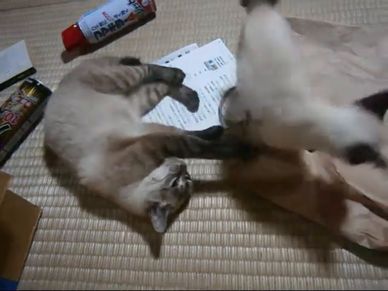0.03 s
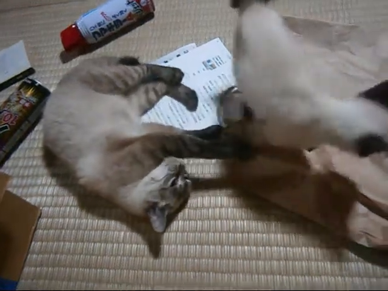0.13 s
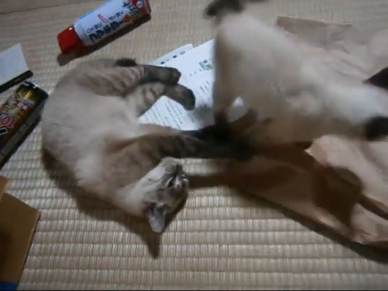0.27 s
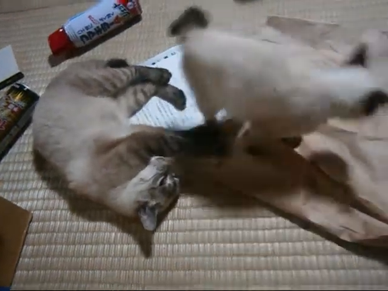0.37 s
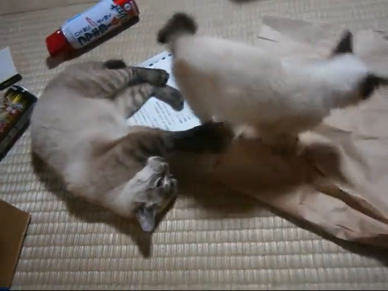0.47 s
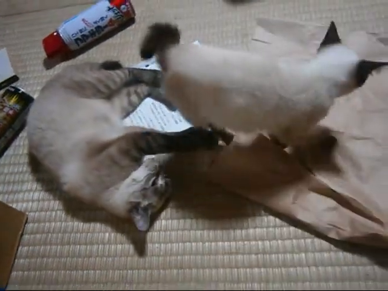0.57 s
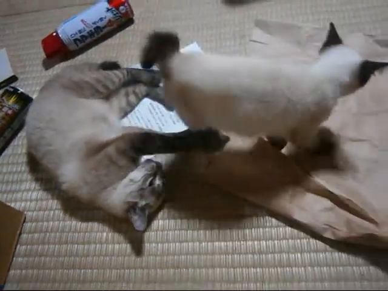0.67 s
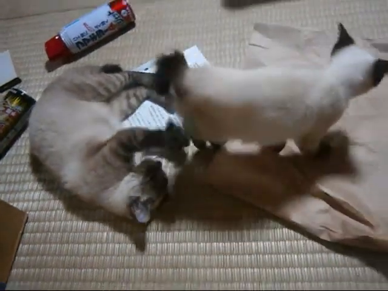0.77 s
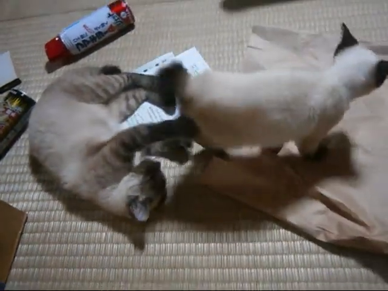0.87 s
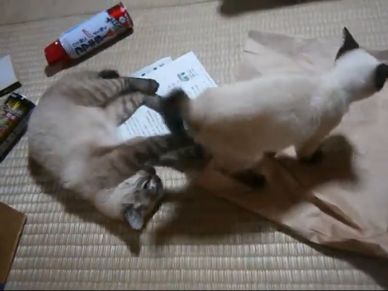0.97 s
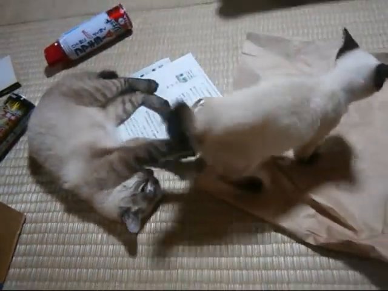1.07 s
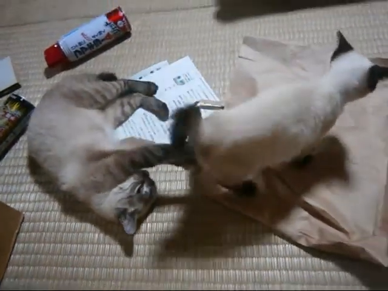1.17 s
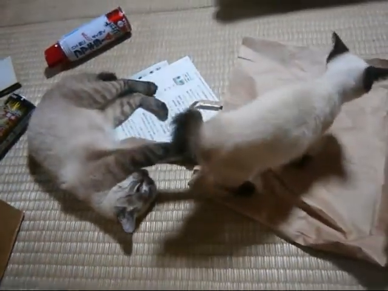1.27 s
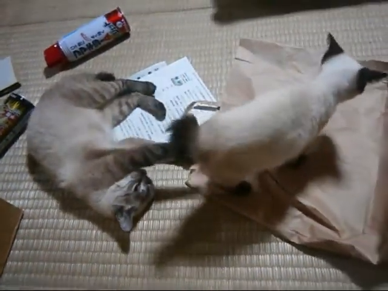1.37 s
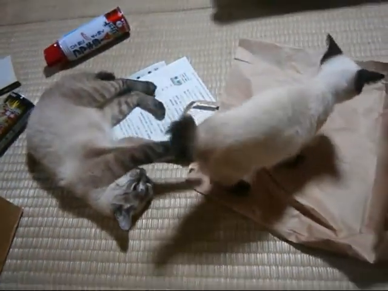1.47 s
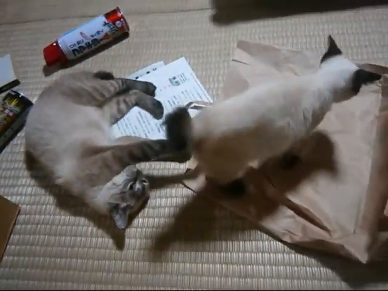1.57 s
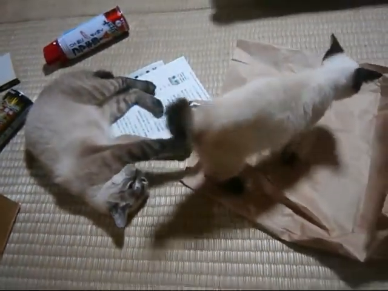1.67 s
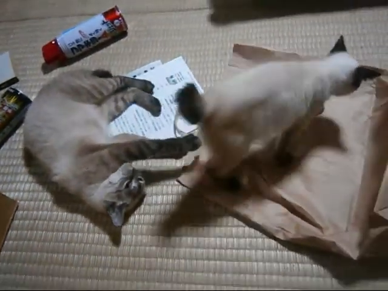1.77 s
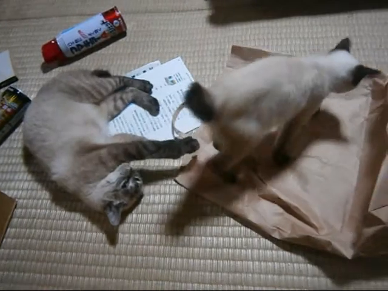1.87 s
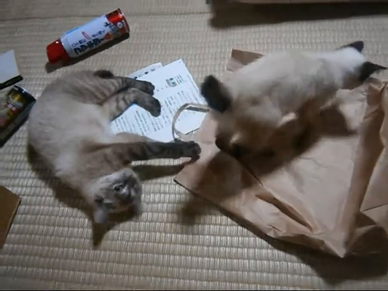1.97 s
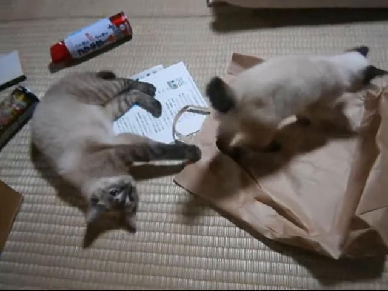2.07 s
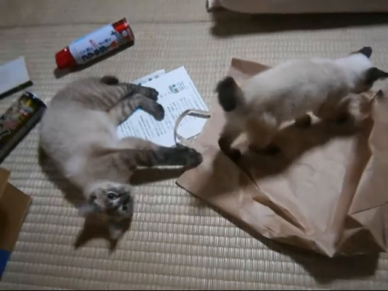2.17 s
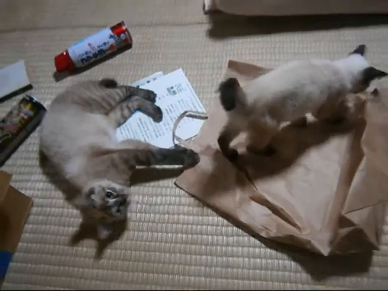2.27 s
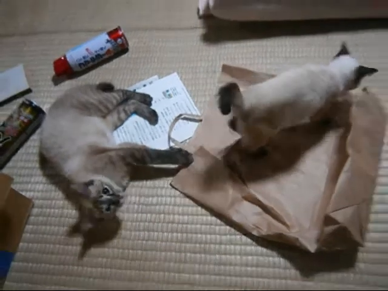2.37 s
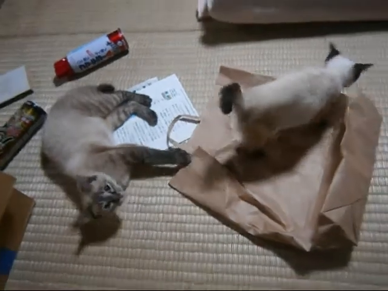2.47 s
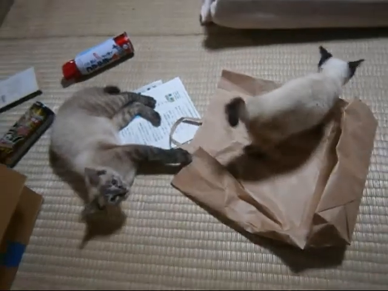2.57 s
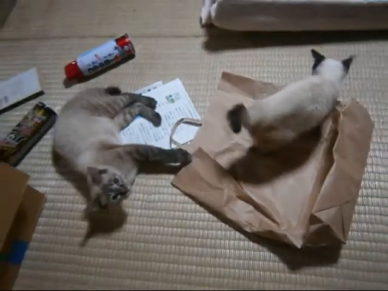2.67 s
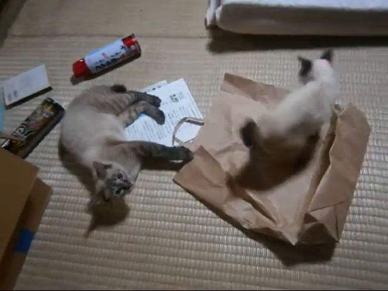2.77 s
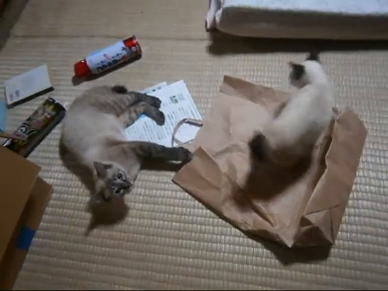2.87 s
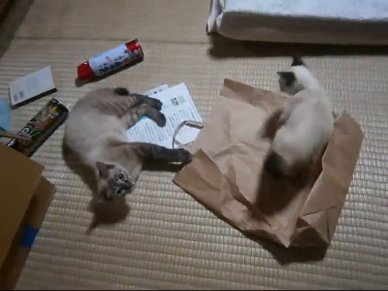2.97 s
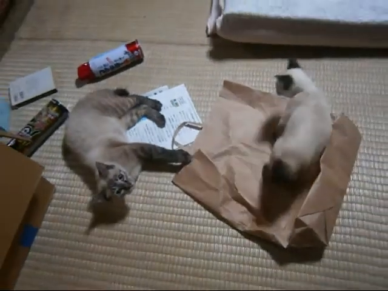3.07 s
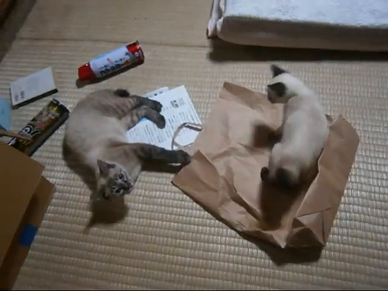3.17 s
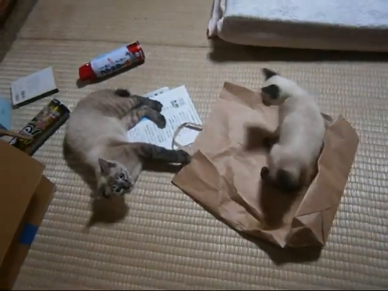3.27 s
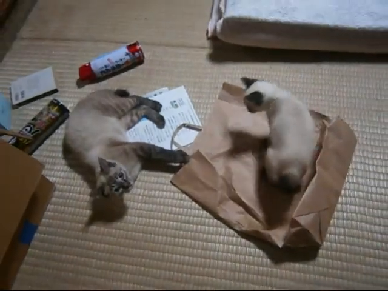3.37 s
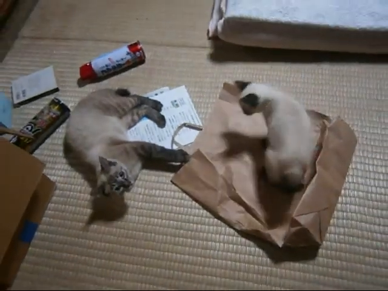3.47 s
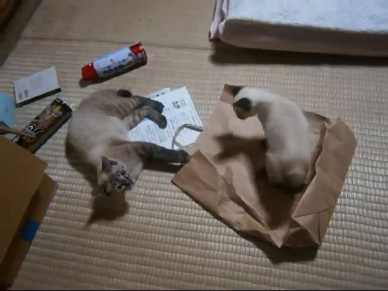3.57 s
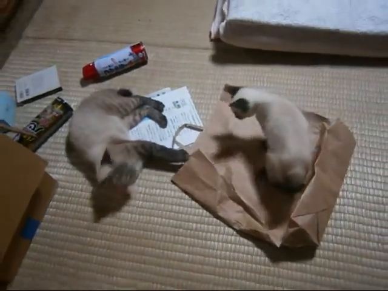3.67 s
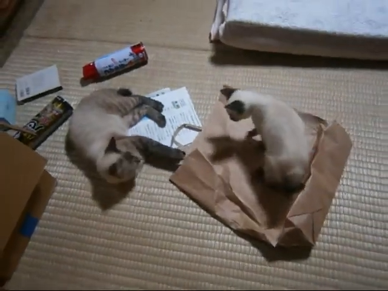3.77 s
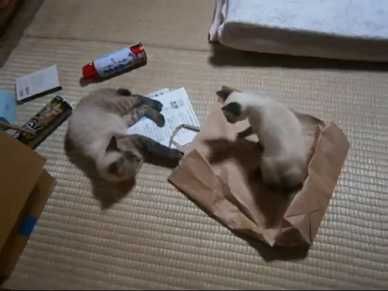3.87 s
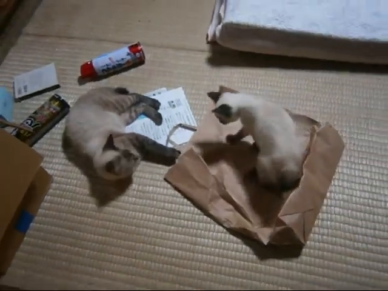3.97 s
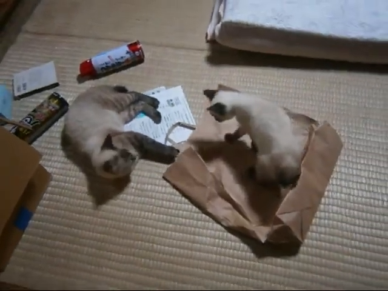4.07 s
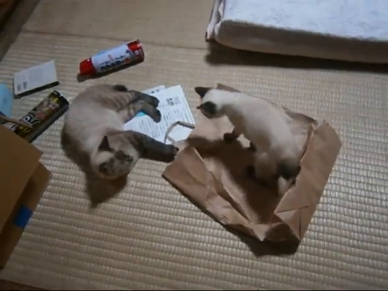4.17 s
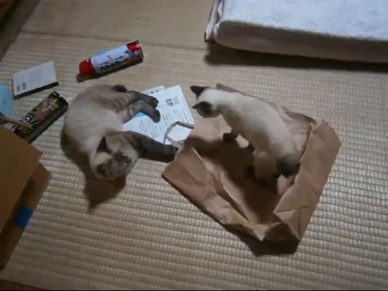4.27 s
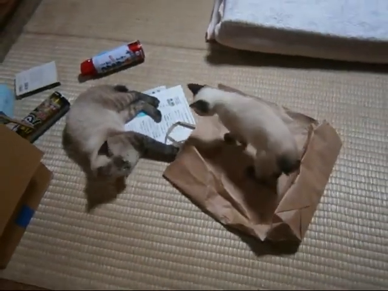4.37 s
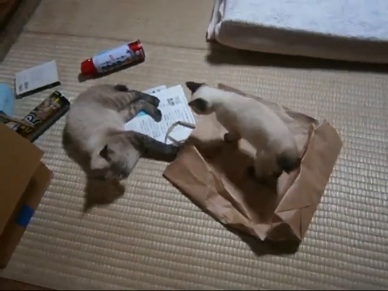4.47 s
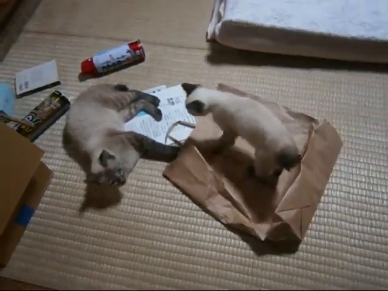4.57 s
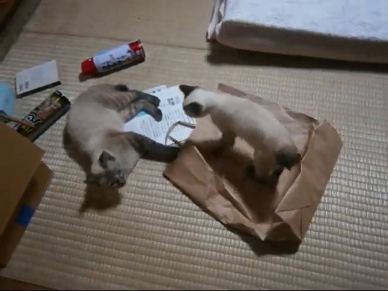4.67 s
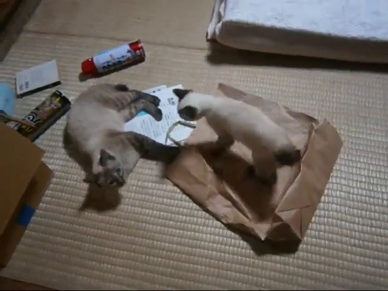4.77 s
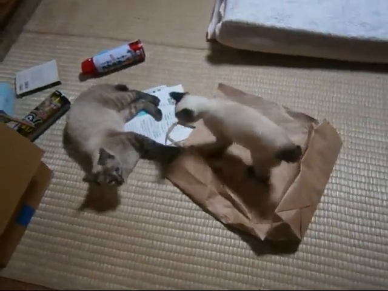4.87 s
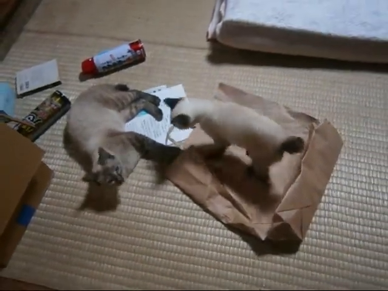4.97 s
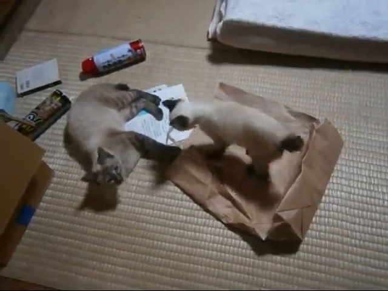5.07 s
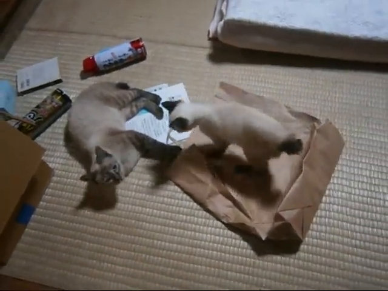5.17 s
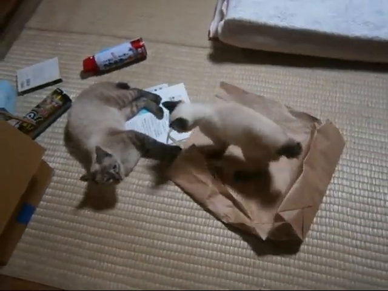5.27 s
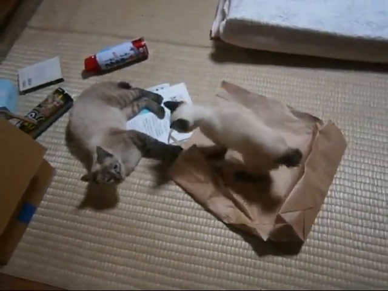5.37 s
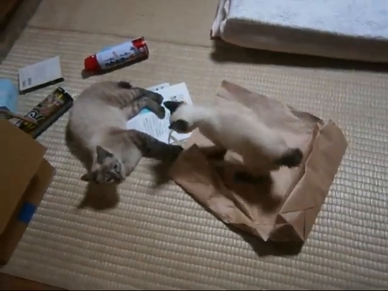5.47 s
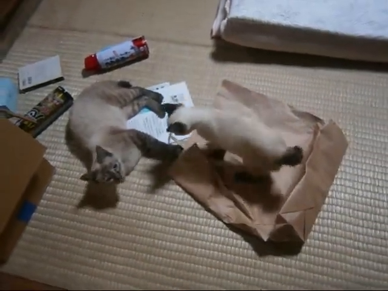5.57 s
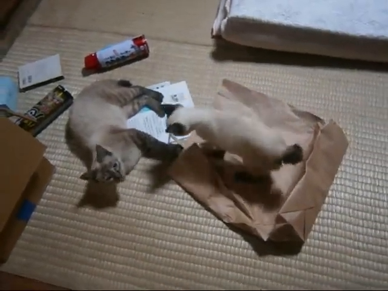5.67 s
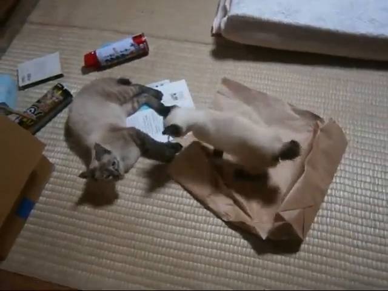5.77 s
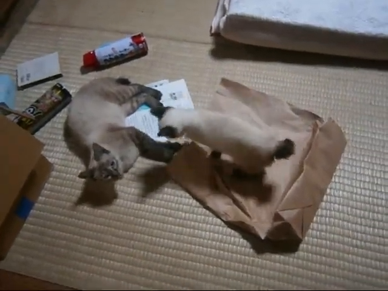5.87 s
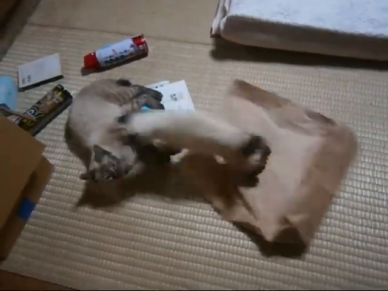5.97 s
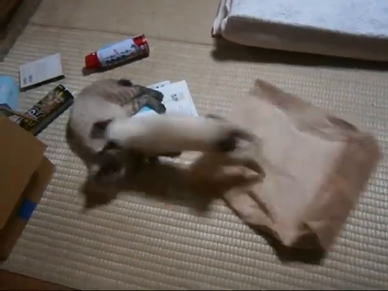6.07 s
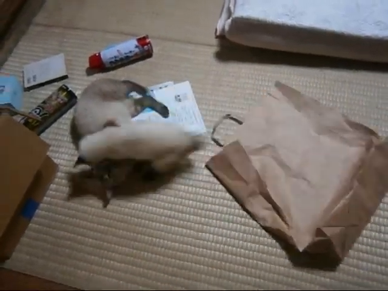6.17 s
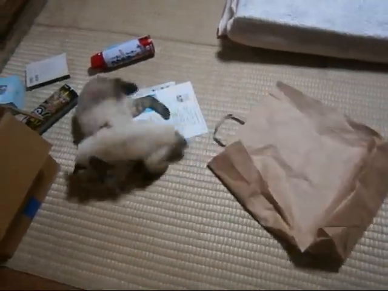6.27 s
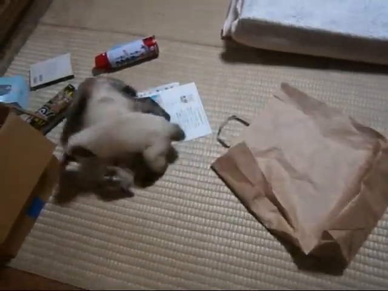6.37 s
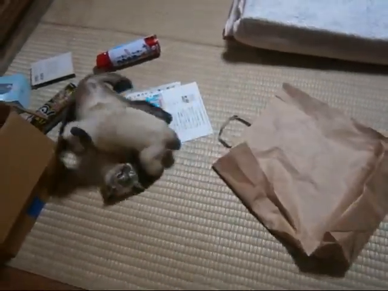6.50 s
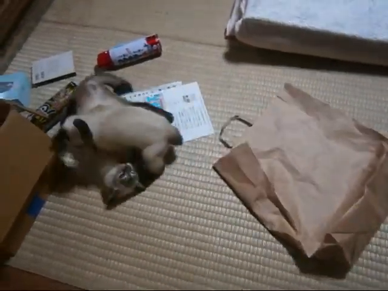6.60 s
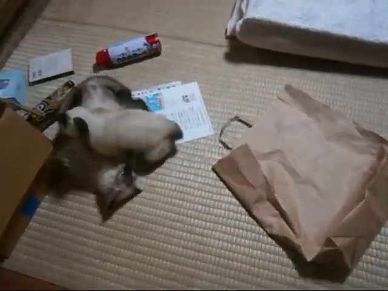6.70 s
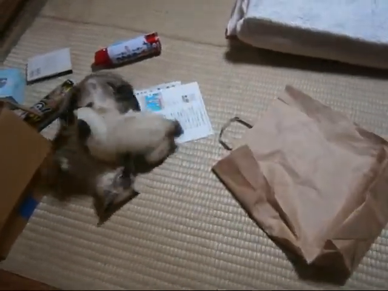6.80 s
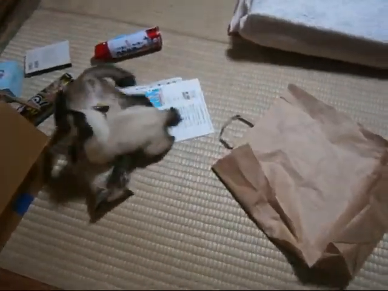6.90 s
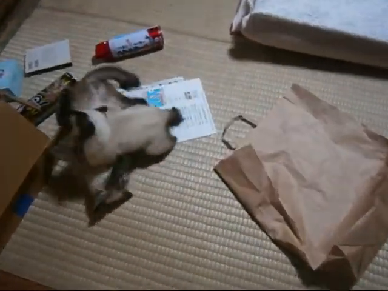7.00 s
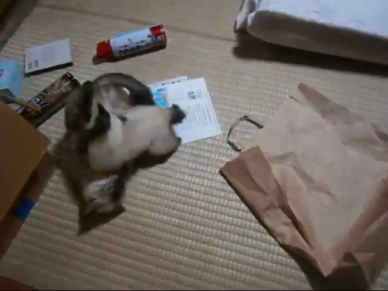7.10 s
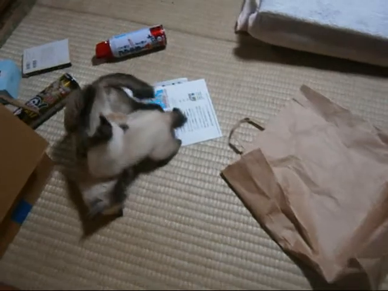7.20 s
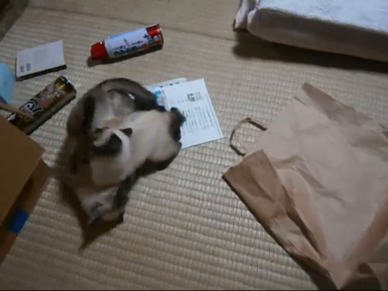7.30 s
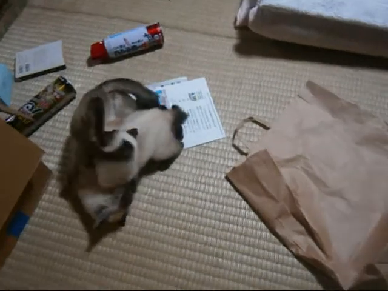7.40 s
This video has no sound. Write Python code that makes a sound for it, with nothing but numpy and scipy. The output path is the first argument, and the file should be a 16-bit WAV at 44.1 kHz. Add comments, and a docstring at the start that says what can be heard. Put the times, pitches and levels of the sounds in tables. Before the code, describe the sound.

A kitten's paws crackle a paper bag on a straw mat, then it leaps with a rasping slide, crickets faintly trilling behind.

```python
"""A paper bag on a straw mat crackles under a kitten, which then leaps off and sends it sliding.
Buckling folds excite resonances of crease, panel and enclosed air; friction noise makes the scuffs.
Padded paws thump the mat, and the leap gives a rustle that rises, drones and coasts to rest.
A small room answers with a ceiling echo and a short noise tail. Behind lie a low rumble and hiss,
faint crickets made of resonant noise, and the camera's thin sine whine."""
import sys
import numpy as np
from scipy import signal
from scipy.fft import rfft, irfft
from scipy.io import wavfile

SR = 44100
rng = np.random.default_rng(int(sys.argv[2]) if len(sys.argv) > 2 else 0)


def store_pcm(level_fs):
    """Save levels as 16-bit WAV."""
    pcm = np.round(np.clip(level_fs, -1, 1) * 32767).astype(np.int16)
    wavfile.write(sys.argv[1], SR, np.atleast_2d(pcm).T)


N = 328104
TIME = np.arange(N) / SR
HIT_TIME = np.arange(4096) / SR  # time axis of one short sound [s]

# gain of the steady rumble and hiss: (frequency [Hz], gain [dB])
AMBIENCE_SPECTRUM = [(25, -12.5), (60, -6), (130, 1), (350, 0.5), (600, -3.5), (1200, -9), (2200, -13),
                     (4500, -14.5), (6400, -18.5), (7400, -12.5), (8400, -17), (11300, -14.5),
                     (12400, -18.5), (16000, -22)]
AMBIENCE_DB = -46

# steady trills of further insects: (frequency [Hz], width [Hz], level [dB])
INSECT_TRILLS = [(5650, 18, -67), (7650, 410, -58.5), (11000, 350, -73)]
# resonance of the cricket's wing: (frequency [Hz], width [Hz], gain [dB])
WING_MODES = [(3840, 590, 0)]
FIRST_CHIRP_S, CHIRP_PERIOD_S, CHIRP_LENGTH_S, CHIRP_JITTER_S = 0.11, 0.267, 0.26, 0.0059

# paws and fur scuffing the paper: (middle [s], length [s], sheet level before the swell [dB])
PAW_SCUFFS = [(0.22, 0.051, -55), (0.352, 0.055, -45.5), (0.422, 0.044, -48), (0.644, 0.056, -46),
              (0.704, 0.057, -49), (1.052, 0.08, -47), (1.492, 0.031, -47), (1.787, 0.078, -45.5),
              (1.949, 0.067, -47), (2.132, 0.094, -48), (2.553, 0.058, -46.5), (2.846, 0.042, -39.5),
              (2.923, 0.031, -48), (3.094, 0.075, -47), (3.294, 0.056, -46.5), (3.577, 0.042, -47.5),
              (4.786, 0.046, -50.5), (5.275, 0.024, -44.5), (5.84, 0.03, -47), (6.37, 0.068, -50.5),
              (6.763, 0.074, -53), (6.922, 0.086, -49), (7.064, 0.054, -49), (7.2, 0.092, -55.5)]
# gain of the sheet's rustle: (frequency [Hz], gain [dB])
SHEET_SPECTRUM = [(100, -33), (350, -14), (650, -4.5), (950, 0.5), (1800, -1.5), (2300, -5.5), (2750, 4.5),
                  (3900, 2), (4600, -12), (8000, -33)]
# gain of the hiss of the paper's fibres: (frequency [Hz], gain [dB])
FIBRE_SPECTRUM = [(2500, -50), (4600, -9.5), (6000, -2), (7500, 2.5), (8800, 0), (10500, 0.5), (12500, -14),
                  (16000, -22)]
# paper held down by a paw is duller: (frequency [Hz], gain [dB])
HELD_PAPER = [(1500, 4.0), (3000, -3)]
# at EVEN_SCUFF_DB fibres and sheet are equally loud; a lighter touch is hissier, a heavier one duller
EVEN_SCUFF_DB, HISS_DB_PER_DB = -49.5, 0.46

# absorption by the room's surfaces: (frequency [Hz], gain [dB])
ROOM_SPECTRUM = [(200, 0.5), (1200, -0.5), (3200, -6.0), (7000, -6.5), (12000, -9.0)]

# paper snaps: (time [s], panel level over 10 ms [dB], panel pitch [Hz],
#               crease re panel [dB], tick re panel [dB], hollow re panel [dB])
PAPER_SNAPS = [(0.442, -50, 1220, 1, 10, -14), (0.6577, -38.5, 1310, -5, -14, -6),
               (0.6991, -40, 1210, 3, -0.5, -5), (0.7038, -34, 1140, -3.5, -1, -9),
               (0.7403, -31.5, 1430, -4.5, 0, -10.5), (0.8211, -41.5, 1110, -6, -7, -9),
               (0.9944, -40, 1220, -7, -3.5, -10), (1.0356, -36.5, 1240, -1, -4.5, -5),
               (1.0549, -40.5, 1420, -2, -3.5, -6), (1.1357, -26.5, 1520, 1, -3, -6.5),
               (1.1883, -30, 1200, 5, -4, -13), (1.2475, -37.5, 1220, -7, -20, -20),
               (1.2822, -25.5, 1130, -5.5, -17, -6.5), (1.4455, -39.5, 1200, -4, -12, -17),
               (1.773, -34, 1280, -13, -5, -20), (1.7775, -31.5, 1210, -18, -10.5, -14),
               (1.8204, -29.5, 1130, -13, -13, -3.5), (2.1863, -41, 1440, -13, -13, -7),
               (2.2498, -22.5, 1270, 0.5, -0.5, -9), (2.3507, -37.5, 1280, -9, -24.5, -3.5),
               (2.542, -37.5, 1160, -8, -12, -4), (2.5724, -41, 1380, -16, -15, -3),
               (2.6361, -49.5, 1260, 0.5, 5.5, -3), (2.8104, -29, 1140, -6.5, -19.5, -9.5),
               (2.821, -30, 970, -19, -24.5, -18), (2.83, -39, 1060, 4, 2, -1),
               (3.1066, -40.5, 1360, -5, -14.5, -4.5), (3.1938, -25, 1120, -4, -16.5, -21),
               (3.3445, -33.5, 1220, -13, -27, -5), (4.866, -43.5, 890, -20, -15, -13),
               (4.9639, -34, 870, -6.5, -11.5, -6.5), (5.1208, -33, 1120, -9, -16.5, -8),
               (5.1404, -26, 1025, -6, -28, -8.5), (5.1434, -28, 970, -0.5, -11, -5.5),
               (5.1546, -29.5, 1030, -24, -23.5, -10), (5.1828, -39, 1050, -18, -24.5, -9),
               (5.8545, -45.5, 1570, 2, -4.5, -6), (6.0567, -29, 1080, -7, -8.5, -20),
               (6.2065, -37.5, 910, -9, -3.5, -13), (6.934, -44.5, 1310, -3, 0.5, -1),
               (7.051, -46, 1020, -12, 1.5, 3), (7.3715, -55, 1320, 9.5, -8, 0)]
# modes of a paper panel: (multiple of its pitch, width before widening [Hz], level [dB])
PANEL_MODES = [(.82, 150, -9), (.98, 149, 2.5), (1.14, 181, -4), (1.52, 280, -6.5)]
# resonances of a stiff crease: (frequency [Hz], width before widening [Hz], level [dB])
CREASE_MODES = [(3020, 350, 3), (3450, 600, 0), (3680, 270, -3.5)]
# resonances of the air between the sheets: (frequency [Hz], width before widening [Hz], level [dB])
HOLLOW_MODES = [(446, 280, 0), (596, 210, -1.2)]
# gain of a fold's tick before its tilt: (frequency [Hz], gain [dB])
TICK_SPECTRUM = [(1500, -6), (3800, -37), (5200, 1), (7200, 5.5), (8500, -2), (10500, -2), (12000, -12),
                 (13500, -25), (16000, -31)]
# reference fold time when tick equals panel; it doubles for each FOLD_DOUBLING_DB less tick
REFERENCE_FOLD_S, FOLD_DOUBLING_DB = 0.0013, 26

# soft paw landings: (time [s], thud level over 10 ms [dB], slap re thud [dB])
PAW_THUDS = [(1.034, -39, 0), (1.186, -43, 0), (6.104, -49.5, 15), (6.207, -35.5, -3), (6.219, -45, 0),
             (6.234, -39, -19)]
# resonances of the mat and floor under a paw: (frequency [Hz], width [Hz], gain [dB])
MAT_MODES = [(45, 24, 1), (124, 51, 1.5), (210, 60, 4)]

# drone of the whole bag as it skids: (frequency [Hz], width [Hz], gain [dB])
BAG_MODES = [(942, 53, 0)]
# the leap drives the bag at full speed from PUSH_S until the hind paws leave it at RELEASE_S
PUSH_S, RELEASE_S, SLIDE_DB = 6.0, 6.079, -27.5
SPEED_UP_DB_PER_S, COAST_DB_PER_S = 252, 142
SLIDE_HISS_DB, PUSH_HISS_DB = -0.1, 3.5  # fibre hiss re sheet, and its rise in the middle of the push
UNLOAD_DB, UNLOAD_S = -1, 0.0037  # the bag is quieter once the kitten's weight is off it

WHINE_HZ, WHINE_DB, TOP_HZ = 14947, -56.5, 15800


def undb(db):
    """The decibel is logarithmic: 20 dB is a tenfold amplitude gain."""
    return 10 ** (np.asarray(db) / 20)


def level(x, db):
    """Root-mean-square amplitude states the mean power of a steady sound."""
    return x * undb(db) / np.sqrt(np.mean(x ** 2))


def burst(x, db):
    """Energy states the strength of a transient: that of 10 ms at the given level."""
    return x * undb(db) * np.sqrt(SR / 100 / np.sum(x ** 2))


def add(out, s, x):
    """Superposition: a short sound starting at s seconds adds to the pressure already there."""
    i = max(int(s * SR), 0)
    out[i:i + len(x)] += x[:len(out) - i]


def positive_frequencies(count):
    """Discrete Fourier analysis: bin frequencies in Hz, floored at 1 Hz to allow division."""
    return np.maximum(np.fft.rfftfreq(count, 1 / SR), 1)


def ring(x, modes):
    """Modal superposition: parallel second-order resonators (Hz, width, dB) share one drive."""
    f = positive_frequencies(len(x))
    response = sum(undb(db) / (1 + 1j * (f / hz - hz / f) * hz / width) for hz, width, db in modes)
    return irfft(rfft(x) * response, len(x))


def colour(x, points):
    """Minimum phase: a causal filter is derived from its gain alone, given as (Hz, dB) points."""
    hz, db = np.transpose(points)
    f = positive_frequencies(len(HIT_TIME))
    cepstrum = irfft(np.log(undb(np.interp(np.log(f), np.log(hz), db))))
    # folding the cepstrum onto positive time makes the filter causal
    half = len(HIT_TIME) // 2
    cepstrum[1:half] *= 2
    cepstrum[half + 1:] = 0
    impulse_response = irfft(np.exp(rfft(cepstrum)))
    return signal.fftconvolve(x, impulse_response)[:len(x)]


def band(x, low_hz, high_hz):
    """Band-pass transformation of a second-order low-pass: 12 dB an octave on each side."""
    f = positive_frequencies(len(x))
    s = 1j * (f - low_hz * high_hz / f) / (high_hz - low_hz)
    return irfft(rfft(x) / (1 + np.sqrt(2) * s + s * s), len(x))


def ambience():
    """Stationary noise: spectral shaping of white noise gives a low rumble under a faint hiss."""
    return level(colour(rng.standard_normal(N), AMBIENCE_SPECTRUM), AMBIENCE_DB)


def insects():
    """Resonant radiation: narrow noise bands form distance-blurred chirps and steady trills."""
    chirps = np.zeros(N)
    swell = np.hanning(int(CHIRP_LENGTH_S * SR))
    for s in np.arange(FIRST_CHIRP_S, TIME[-1] - CHIRP_JITTER_S, CHIRP_PERIOD_S):
        middle_s = s + CHIRP_JITTER_S * rng.standard_normal()
        add(chirps, middle_s - CHIRP_LENGTH_S / 2, swell)
    wing = ring(ring(rng.standard_normal(N), WING_MODES), WING_MODES)
    cricket = chirps * level(wing, -57.5)
    trills = sum(level(ring(rng.standard_normal(N), [(hz, width, 0)]), db)
                 for hz, width, db in INSECT_TRILLS)
    return cricket + trills


def friction(rate, spread_db, smooth_db):
    """Stick-slip: fibres catch and slip in uneven clicks, exciting sheet rustle and fibre hiss."""
    slipping = rng.random(N) < rate / SR  # rate in slips per second
    sign = rng.choice([-1, 1], N)
    size = undb(spread_db * np.minimum(rng.exponential(1, N), 3))
    drive = level(slipping * sign * size, 0) + level(rng.standard_normal(N), smooth_db)
    # bending waves are dispersive: the lows of each slip arrive after its highs
    dispersion = np.exp(-1.2j * np.sqrt(np.fft.rfftfreq(N, 1 / SR)))
    drive = irfft(rfft(drive) * dispersion, N)
    return level(colour(drive, SHEET_SPECTRUM), 0), level(colour(drive, FIBRE_SPECTRUM), 0)


def scuffs():
    """Sliding friction: a shifting paw gives short rubs, duller as they grow louder."""
    sheet, fibres = friction(rate=300, spread_db=5.0, smooth_db=-3)
    sheet = colour(sheet, HELD_PAPER)
    out = np.zeros(N)
    for s, length_s, db in PAW_SCUFFS:
        near = np.abs(TIME - s) < 2 * length_s
        swell = np.exp(-2 * ((TIME[near] - s) / length_s) ** 2)
        hiss_db = HISS_DB_PER_DB * (EVEN_SCUFF_DB - db)
        rub = level(sheet[near], 0) + undb(hiss_db) * level(fibres[near], 0)
        out[near] += swell * undb(db) * rub
    return out


def room(x, wet_db, t60_s, ceiling_s, ceiling_db):
    """Reverberation: the mat absorbs the first sound, then ceiling and walls answer and die quickly."""
    t = np.arange(SR // 2) / SR
    arrival = np.clip((t - .005) / 0.004, 0, 1)
    tail = rng.standard_normal(len(t)) * arrival * undb(-60 * t / t60_s)
    response = undb(wet_db) * tail / np.sqrt(np.sum(tail ** 2))
    response[int(ceiling_s * SR)] += undb(ceiling_db)
    return colour(signal.fftconvolve(x, response)[:N], ROOM_SPECTRUM)


def buckle(fold_s, even, count):
    """Snap-through instability: a crease yields in clicks that swell and thin as the fold travels."""
    lag = rng.gamma(2, fold_s / 2, count)
    sign = rng.choice([-1, 1], count)
    size = sign * (even + rng.random(count)) * np.exp(-lag / fold_s / 2)
    push = np.zeros(len(HIT_TIME))
    index = np.minimum((lag - lag.min()) * SR, len(HIT_TIME) - 1).astype(int)
    np.add.at(push, index, size)
    return push


def strike(x, modes, db, scatter, widen):
    """Modal excitation: each mode takes its share of energy, detuned anew for every fold."""
    total = 0
    for hz, width, share_db in modes:
        tuned_hz = hz * np.exp(scatter * rng.standard_normal())
        total = total + burst(ring(x, [(tuned_hz, widen * width, 0)]), share_db)
    return burst(band(total, 0.71 * modes[0][0], 1.194 * modes[-1][0]), db)


def snaps(widen, count):
    """Impulsive excitation: a buckle ticks, rings crease and panel, and pumps the enclosed air."""
    out = np.zeros(N)
    for s, db, pitch_hz, crease_db, tick_db, hollow_db in PAPER_SNAPS:
        fold_s = REFERENCE_FOLD_S * 2 ** (-tick_db / FOLD_DOUBLING_DB)
        quick = buckle(1.1 * fold_s, even=0.84, count=count)
        slow = buckle(1.368 * fold_s, even=0.35, count=count)
        # bending waves keep bouncing between the folds of the sheet
        flutter = rng.standard_normal(len(HIT_TIME)) * np.exp(-HIT_TIME / 0.0069)
        slow = burst(slow, 0) + burst(flutter, -3.5)
        quick = burst(quick, 0) + burst(flutter, -13.5)
        panel_modes = [(pitch_hz * multiple, width, g) for multiple, width, g in PANEL_MODES]
        panel = strike(slow, panel_modes, db, scatter=0.035, widen=widen)
        crease = strike(quick, CREASE_MODES, db + crease_db, scatter=0.022, widen=widen)
        hollow = strike(slow, HOLLOW_MODES, db + hollow_db, scatter=0.096, widen=widen)
        # a sharper crease ticks both louder and higher: tilt in dB per octave above 5 kHz
        tilt_db = 0.6 * (tick_db + 8)
        tilted = [(hz, g + tilt_db * np.log2(max(hz / 5000, 1))) for hz, g in TICK_SPECTRUM]
        tick = burst(colour(quick, tilted), db + tick_db)
        add(out, s, panel + crease + hollow + tick)
        # fibres creak for an instant before the fold gives way
        creak = band(rng.standard_normal(len(HIT_TIME)), 2500, 10000) * np.exp(-HIT_TIME[::-1] / 0.0014)
        add(out, s - HIT_TIME[-1], burst(creak, db + tick_db - 18))
    return out


def thuds():
    """Soft impact: a padded paw's smooth force pulse rings the mat, and noise slaps its surface."""
    out = np.zeros(N)
    push = HIT_TIME * np.exp(-HIT_TIME / 0.00072)
    for s, db, slap_db in PAW_THUDS:
        slap = band(rng.standard_normal(len(HIT_TIME)) * np.exp(-HIT_TIME / 0.01), 360, 700)
        add(out, s, burst(ring(push, MAT_MODES), db) + burst(slap, db + slap_db))
    return out


def slide():
    """Driven friction: the hind legs' kick slides the bag over the weave, then it coasts to rest."""
    before_s, after_s = np.maximum(PUSH_S - TIME, 0), np.maximum(TIME - RELEASE_S, 0)
    progress = np.clip((TIME - PUSH_S) / (RELEASE_S - PUSH_S), 0, 1)
    unload_db = UNLOAD_DB * np.minimum(after_s / UNLOAD_S, 1)
    db = SLIDE_DB - SPEED_UP_DB_PER_S * before_s - COAST_DB_PER_S * after_s + unload_db
    # fibre hiss is strongest in the middle of the push
    hiss_db = SLIDE_HISS_DB + PUSH_HISS_DB * np.sin(np.pi * progress)
    sheet, fibres = friction(rate=5000, spread_db=-0.5, smooth_db=-3.0)
    # the bag catches and lets go on the ribs of the mat
    catch = level(band(rng.standard_normal(N), 30, 170), 0)
    # it drones while the kitten's weight still stretches it
    stretched = np.clip(before_s / 0.05 + 1 - progress, 0, 2)
    drone = stretched * level(ring(rng.standard_normal(N), BAG_MODES), -7)
    return undb(db + 0.93 * catch) * (sheet + drone + undb(hiss_db) * fibres)


def scene():
    """Superposition: direct and reflected paper and paw sounds add to the background, in two equal channels."""
    background = ambience() + insects()
    rubs = scuffs() + slide() + thuds()
    near = snaps(widen=0.88, count=36) + rubs
    # the walls gather each snap from all directions, which evens out its peaks and notches
    radiated = snaps(widen=2.4, count=1) + rubs
    reflected = room(radiated, wet_db=-5.5, t60_s=0.34, ceiling_s=.0155, ceiling_db=-27.5)
    mono = near + reflected + background
    return np.array([mono, mono])


def record(dry):
    """Band limitation: the camera adds a sine whine, cuts the top and shifts the zero line."""
    whine = level(np.sin(2 * np.pi * WHINE_HZ * TIME), WHINE_DB)
    low_pass = signal.ellip(10, .1, 70, TOP_HZ, fs=SR, output="sos")
    offset = -.0096
    return signal.sosfilt(low_pass, dry + whine) + offset


dry = scene()
out = record(dry)
store_pcm(out)
```